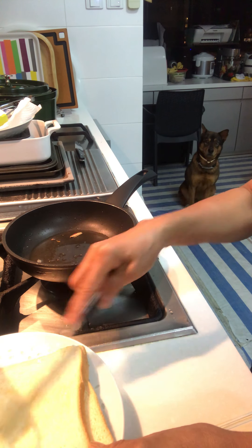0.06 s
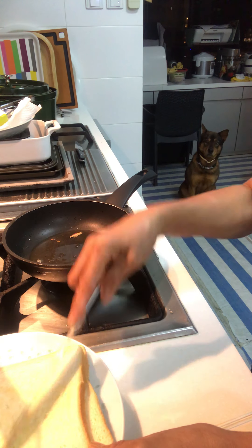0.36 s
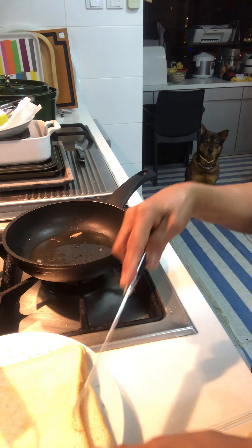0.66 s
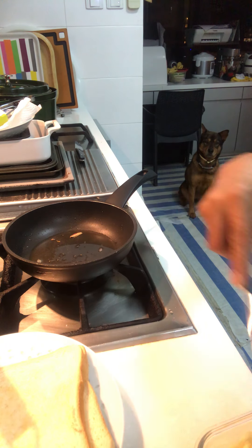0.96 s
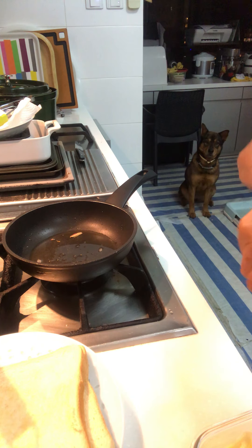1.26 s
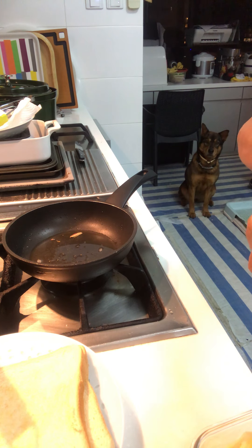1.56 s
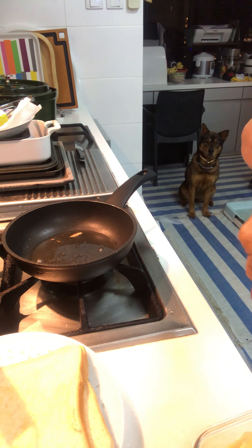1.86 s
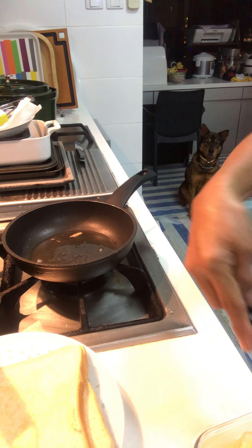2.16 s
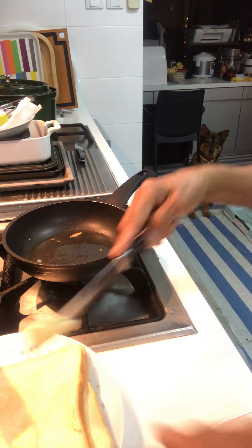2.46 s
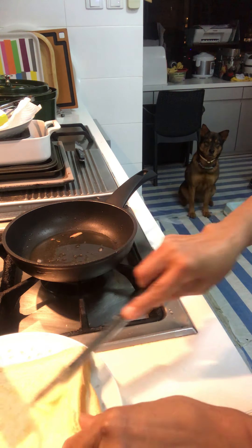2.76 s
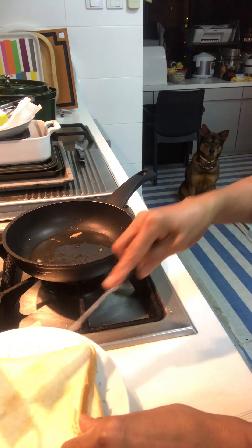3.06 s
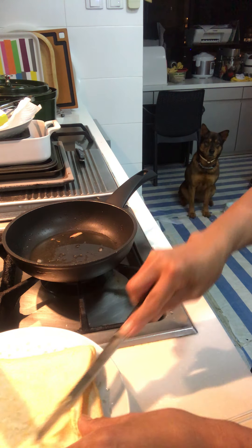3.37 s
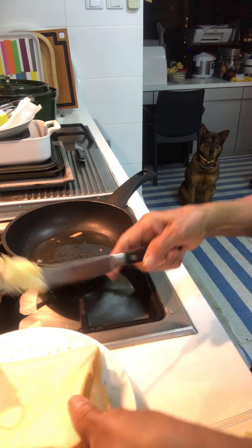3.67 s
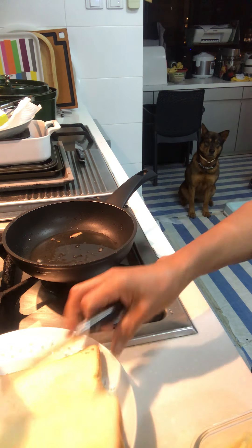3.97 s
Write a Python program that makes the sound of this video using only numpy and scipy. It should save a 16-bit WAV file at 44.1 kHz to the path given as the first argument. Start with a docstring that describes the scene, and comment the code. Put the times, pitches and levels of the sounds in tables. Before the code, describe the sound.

Close, dry scraping of a knife buttering toast comes in two pairs of strokes, with faint blade ticks and one sharp knock on a dish between them. Behind it, a fan drones steadily in a small tiled kitchen.

```python
"""A small tiled kitchen, the microphone close to a slice of toast. A fan drones from start to finish.
A table knife spreads butter in two rasping strokes, breaking crumbs and cracking the crust; a soft bump
follows. Fetching more butter, the blade ticks twice and knocks once on a dish, and the room answers.
Two more strokes cross the toast, the slice rustles as the blade lifts, and a dull bump comes last."""
import sys
import numpy as np
from scipy import signal
from scipy.fft import rfft, irfft, next_fast_len
from scipy.io import wavfile
from scipy.ndimage import uniform_filter1d, map_coordinates

SR = 44100
rng = np.random.default_rng(int(sys.argv[2]) if len(sys.argv) > 2 else 0)


def file_out(sig):
    """Save sig as 16-bit WAV at sys.argv[1]."""
    # one column per channel
    cols = np.atleast_2d(sig).T
    # limit, then scale
    lim = np.clip(cols, -1, 1)
    pcm = np.round(lim * 32767).astype(np.int16)
    wavfile.write(sys.argv[1], SR, pcm)


N = 4 * SR


def amp(db):
    """Decibels to gain."""
    return 10 ** (np.asarray(db) / 20)


def unit(x):
    """Scale to rms 1."""
    return x / np.sqrt(np.mean(x ** 2) + 1e-20)


def along(points, hz):
    """Read (Hz, value) points on a log frequency axis."""
    f, v = np.transpose(points)
    return np.interp(np.log(hz + 1), np.log(f + 1), v)


def clock():
    """Time of every sample in seconds."""
    return np.arange(N) / SR


def wobble(per_s):
    """A smooth random curve with per_s knots a second."""
    return map_coordinates(rng.standard_normal(4096), [clock() * per_s], mode="wrap")


def filtered(x, response):
    """x through a response given as a function of Hz."""
    size = next_fast_len(N + SR // 2)
    return irfft(rfft(x, size) * response(np.fft.rfftfreq(size, 1 / SR)), size)[:N]


def coloured(x, spectrum):
    """x shaped by (Hz, dB) points, at rms 1."""
    return unit(filtered(x, lambda hz: amp(along(spectrum, hz))))


def resonant(peaks):
    """Noise in resonances given as (centre Hz, width Hz, dB)."""
    out = np.zeros(N)
    for hz, width, db in peaks:
        band = filtered(rng.standard_normal(N), lambda f: 1 / (1 + ((f - hz) / width * 2) ** 2))
        out += amp(db) * unit(band)
    return out


def fade(t, t60):
    """Exponential decay, 60 dB down after t60 seconds."""
    return np.exp(-np.log(1000) * t / t60)


def add(track, s, sound):
    """Mix a sound in at s seconds."""
    part = track[round(s * SR):][:len(sound)]
    part += sound[:len(part)]


# The swell of the fan's main tone. Each row: time in seconds, relative level in dB.
DRONE_SWELL = [(0, -40), (0.11, -47), (0.21, -31.5), (0.35, -39), (0.42, -30), (0.51, -28), (0.58, -45.5),
               (0.68, -38.5), (0.75, -31.5), (1.08, -36.5), (1.22, -31), (1.6, -39.5), (1.8, -47),
               (2.05, -32), (2.24, -43.5), (2.38, -35), (2.57, -64.5), (2.68, -35.5), (2.95, -31.5),
               (3.24, -35), (3.44, -37.5), (3.55, -34.5), (3.8, -30.9), (4.0, -42)]
# The fan's other tones. Each row: pitch in Hz, level in dB.
ROTOR_TONES = [(47.5, -56.5), (72, -51), (120, -44.5), (144, -48.5), (169, -47), (196, -47.5), (247, -48),
               (271, -49), (294, -48.5), (343, -56)]


def fan_rotor():
    """The rotor hums behind the toast: one swelling drone among fainter, wavering tones."""
    t = clock()
    drone_hz = 93.82 + 1.004 * wobble(per_s=7.035)
    drone_db = np.interp(t, *np.transpose(DRONE_SWELL)) - 1 + 2.02 * wobble(per_s=11)
    out = amp(drone_db) * unit(np.sin(2 * np.pi * np.cumsum(drone_hz) / SR))
    for hz, db in ROTOR_TONES:
        waver = 1 + 0.691 * (wobble(per_s=8) + 1j * wobble(per_s=8))  # in level and phase
        tone = np.exp(2j * np.pi * (hz * t + rng.random()))
        out += amp(db) * unit(np.real(waver * tone))
    return out


# The fan's rumble and its rush of air. Each row: frequency in Hz, relative level in dB.
RUMBLE_COLOUR = [(15, -61), (25, -39.5), (59, -12.5), (76, -6), (97, -4), (139, -10), (173, -0.5),
                 (220, -9.5), (284, -9.5), (450, -28.5), (580, -73.5), (990, -120)]
AIR_COLOUR = [(240, -11), (400, 1), (470, -4), (560, 1.5), (740, -1), (820, -5.5), (1020, -5.5), (1300, -3),
              (1550, -8.5), (1950, -12), (2250, -11.5), (2650, -10.5), (3200, -10), (3600, -14),
              (4100, -15.5), (4400, -17), (4850, -27.5), (5300, -17), (6600, -17.5), (7450, -25),
              (7900, -20.5), (8600, -22.5), (10400, -33.5), (11900, -26), (13000, -33.5), (14000, -30),
              (16000, -38.5)]
# Resonances of the duct and of a narrow hiss. Each row: centre in Hz, width in Hz, base level in dB.
DUCT_PEAKS = [(1135, 68, -59.5), (1395.8, 97, -58), (1718, 72, -66.5), (2454, 92, -66.5), (3309, 72, -63.5),
              (5658, 284, -63.5), (6994, 185, -72)]
HISS_PEAKS = [(2919, 118, -57), (3051, 167, -56.5)]
# The rise and fall of that hiss. Each row: time in seconds, gain in dB.
HISS_SWELL = [(0, -6), (.36, 3), (.72, 0), (1.1, 0.5), (1.5, 3), (1.9, 1), (2.35, 1.5), (2.52, -2),
              (2.8, -3.5), (3.1, -2.5), (3.35, 3), (3.5, -3.5), (3.7, 2), (4, 0)]


def fan_air():
    """Air rushes through the fan's duct, with a low rumble of eddies and a fluttering hiss."""
    hiss_db = np.interp(clock(), *np.transpose(HISS_SWELL)) + 2.5 * wobble(per_s=25.036)
    eddies = amp(1.5 * wobble(per_s=9)) * rng.standard_normal(N)
    rumble = amp(-40) * coloured(eddies, RUMBLE_COLOUR)
    rush = amp(-48.5) * coloured(rng.standard_normal(N), AIR_COLOUR)
    return resonant(DUCT_PEAKS) + amp(hiss_db) * resonant(HISS_PEAKS) + rumble + rush


def crumbs(per_s=3800, spread_db=3, smear_db=-6):
    """The envelope of countless tiny, uneven fractures over the smooth smear of butter."""
    chance, size = rng.random(N), rng.exponential(size=N)
    breaks = (chance < per_s / SR) * amp(spread_db * np.minimum(size, 5))
    decay = fade(clock()[:SR // 20], t60=0.00174)
    energy = np.abs(signal.fftconvolve(breaks ** 2, decay ** 2)[:N])
    stick_slip = amp(1.8552 * wobble(per_s=216.95))  # the blade catches and slips
    return unit((unit(np.sqrt(energy)) + amp(smear_db)) * stick_slip)


# Four knife strokes close to the microphone, one list each. Each row: time in seconds, rasp level
# in dB, crunch and sizzle offsets from it in dB, all before the trims.
KNIFE_STROKES = [
    [(0.0, -40, 4, -9.5), (0.038, -34.5, 2, -8), (0.074, -20, -5.5, -6.5), (0.118, -30.5, 1, 1),
     (0.162, -37, -5.5, -6), (0.242, -34.5, -7, -3), (0.254, -31.5, -1, -10), (0.264, -60, 2.5, -12),
     (0.29, -56, -5, -4)],
    [(0.38, -46.5, 6, -12), (0.39, -52.5, 1.5, -3), (0.456, -41, 3.5, -0.5), (0.496, -44, -1, -3),
     (0.54, -22, -5.5, -4), (0.59, -34.5, 2, -5.5), (0.608, -55.5, 6.5, 2), (0.64, -62.5, 1.5, -9)],
    [(2.69, -44, -6, -15), (2.7, -56, 3, -4.5), (2.712, -44.5, -1.5, -5.5), (2.724, -47, 8, -9.5),
     (2.732, -37.5, 0, -18.5), (2.744, -38, 2, -8), (2.808, -36.5, 1, -3), (2.872, -42, -3.5, -11),
     (2.894, -44, 2.5, 2), (2.928, -44, 2.5, -6), (2.938, -45.5, -3, -0.5), (2.99, -43, -0.5, -6.5),
     (3.026, -77, 12, -12), (3.03, -59.5, -5, -11)],
    [(3.21, -93.5, -5, -16), (3.224, -38, 1, -10), (3.264, -35.5, -8, -4), (3.278, -38, -4.5, -2.5),
     (3.292, -31, -1.5, -3), (3.314, -37.5, -1.5, -3), (3.414, -46.5, 4.5, -5), (3.428, -42, -3, -14),
     (3.468, -56.5, 11, -1.5), (3.49, -63, 9.5, -2.5)],
]
# The middle, low and high parts of a stroke. Each row: frequency in Hz, relative level in dB.
RASP_COLOUR = [(1500, -58), (2300, -1), (2650, -1.5), (3050, -2.5), (3400, 0.5), (3800, -0.5), (4050, 1),
               (4400, -0.5), (4850, -1.5), (5300, -0.5), (5800, 0), (6500, 0.5), (7400, -3), (8100, -4.5),
               (10500, -34)]
CRUNCH_COLOUR = [(100, -70), (210, -36), (350, -8), (520, -6.5), (640, 0.5), (770, -5), (900, 6.5),
                 (1180, -1.5), (1550, 2), (1900, 4), (2300, -1.5), (2700, 0.5), (3600, -44.5)]
SIZZLE_COLOUR = [(5500, -26), (8000, -3.5), (8800, 3), (10200, -0.5), (11800, 1), (13000, -2),
                 (15600, -0.5), (16500, -17.5)]
# The slice's resonance, stroke by stroke. Each row: centre in Hz, width in Hz, dB against the crunch.
SLICE_HOLLOWS = [(1708, 500, -3), (886, 93, -8.5), (904, 420, -5.5), (1046, 350, -5)]
# Short echoes off plate and worktop. Each row: delay in seconds, gain.
WORKTOP_ECHOES = [(.00135, 0.243), (.0034, -0.257), (.0061, 0.069)]


def spreading(rasp_trim_db=-1, crunch_trim_db=-1.5, sizzle_trim_db=-1.5):
    """Each stroke breaks crumbs: a rasp, a fine sizzle, and the low crunch and resonance of the slice."""
    t, grain = clock(), crumbs()
    levels, direct = np.zeros((3, N)), np.zeros(N)
    for stroke, hollow in zip(KNIFE_STROKES, SLICE_HOLLOWS):
        times, db, low_db, high_db = np.transpose(stroke)
        contact = uniform_filter1d(1.0 * ((t >= times[0]) & (t <= times[-1])), size=256)
        rasp = contact * amp(np.interp(t, times, db + rasp_trim_db))
        crunch = contact * amp(np.interp(t, times, db + low_db + crunch_trim_db))
        sizzle = contact * amp(np.interp(t, times, db + high_db + sizzle_trim_db))
        levels += [rasp, crunch, sizzle]
        direct += crunch * resonant([hollow])
    for level, colour in zip(levels, (RASP_COLOUR, CRUNCH_COLOUR, SIZZLE_COLOUR)):
        direct += level * coloured(grain * rng.standard_normal(N), colour)
    return filtered(direct, lambda hz: 1 + sum(gain * np.exp(-2j * np.pi * hz * delay)
                                               for delay, gain in WORKTOP_ECHOES))


# The tiled room's decay. Each row: frequency in Hz, t60 in seconds.
ROOM_DECAY = [(200, 0.01), (1100, 0.4751), (1850, 0.4215), (3200, 0.4042), (6000, 0.2821), (14000, 0.3662)]
# The tone of its answer. Each row: frequency in Hz, relative level in dB.
ROOM_TONE = [(100, 7), (800, 6.5), (1150, 4), (1900, 4.5), (2500, -2), (3200, 3.5), (7000, 3.5),
             (15000, -3)]


def kitchen(x):
    """The room's answer reaches the microphone 4 ms late, each frequency dying at its own speed."""
    hz, t, spectra = signal.stft(rng.standard_normal(SR // 2), SR, nperseg=256)
    decay = fade(t, along(ROOM_DECAY, hz)[:, None])
    colour = amp(along(ROOM_TONE, hz))[:, None]
    tail = signal.istft(spectra * decay * colour, SR, nperseg=256)[1]
    delayed = np.pad(x, (SR // 250, 0))
    return signal.fftconvolve(delayed, tail / np.linalg.norm(tail))[:N]


# The blade touches or cracks the crust. Each row: start in seconds, level in dB.
CRUST_SNAPS = [(.069, -23), (.076, -24.5), (.083, -16.5), (.12, -24.5), (0.1982, -27), (0.207, -46),
               (0.3804, -38), (0.455, -34.5), (.524, -24), (2.6461, -28.5), (2.649, -29.5), (2.715, -31),
               (2.7319, -22.5), (2.741, -25), (2.774, -25.5), (2.815, -26.5), (2.899, -28.5), (2.953, -31),
               (3.2238, -30.5), (3.244, -37), (3.426, -30.5), (3.736, -41.5), (3.7527, -35)]
# The slice rustles as the blade lifts. Each row: time in seconds, level in dB.
LIFT_RUSTLE = [(3.52, -75.5), (3.565, -54), (3.62, -62.5), (3.69, -56), (3.73, -48.5), (3.755, -58),
               (3.79, -72), (3.87, -74.5)]
# The tone of both. Each row: frequency in Hz, relative level in dB.
CRUST_COLOUR = [(200, -12), (700, 3.5), (1600, 3), (4000, 6), (6000, -1.5), (10000, -10), (16000, -8.5)]


def crust():
    """The crust gives single dry cracks under the blade and a faint, crumbly rustle at the end."""
    rustle_db = np.interp(clock(), *np.transpose(LIFT_RUSTLE), left=-np.inf, right=-np.inf)
    level = amp(rustle_db) * crumbs()
    for s, db in CRUST_SNAPS:
        add(level, s, amp(db) * fade(clock()[:SR // 10], t60=0.0155))
    return level * coloured(rng.standard_normal(N), CRUST_COLOUR)


# Soft bumps of slice and plate. Each row: start in seconds, level in dB, centre in Hz, width in Hz,
# t60 in seconds.
SOFT_BUMPS = [(.670, -34, 910, 701, 0.057), (3.955, -35, 354.4, 90, 0.185)]


def bumps():
    """Dull contacts without a ring: a short puff in one broad resonance."""
    out, t = np.zeros(N), clock()[:SR // 4]
    attack = 1 - np.exp(-t / 0.0025)
    for s, db, hz, width, t60 in SOFT_BUMPS:
        add(out, s, resonant([(hz, width, db)])[:len(t)] * fade(t, t60) * attack)
    return out


def struck(blows, modes, crack_colour, crack_db, crack_t60):
    """Every blow gives a short crack and rings the damped modes, in a slightly different balance."""
    out, t = np.zeros(N), clock()[:SR // 4]
    attack = 1 - np.exp(-t / 0.0003)
    for s, db in blows:
        ring = sum(amp(level + rng.normal(0, 1)) * fade(t, t60) * np.sin(2 * np.pi * hz * t)
                   for hz, level, t60 in modes)
        noise = coloured(rng.standard_normal(N), crack_colour)[:len(t)]
        crack = amp(crack_db) * fade(t, crack_t60) * noise
        add(out, s, amp(db) * (ring + crack) * attack)
    return out


# Light ticks between the pairs of strokes. Each row: start in seconds, level in dB.
BLADE_TICKS = [(1.0355, -39), (1.8277, -27)]
# The blade's modes. Each row: pitch in Hz, relative level in dB, t60 in seconds.
BLADE_MODES = [(3589, 2, 0.0292), (4236, -10.5, 0.029), (4638, -5, 0.0284), (7040, -6.5, .025),
               (7780, -8.5, .022), (13400, -21, .01)]
# The crack of a tick. Each row: frequency in Hz, relative level in dB.
TICK_COLOUR = [(300, -6.5), (1500, 4), (4500, 3), (8000, -17.5), (10000, -20.5), (16000, -23.5)]


def blade_ticks():
    """Light touches set the blade ringing, high and brief."""
    return struck(BLADE_TICKS, BLADE_MODES, TICK_COLOUR, crack_db=-4, crack_t60=0.0316)


# One knock, made of two contacts in quick succession. Each row: start in seconds, level in dB.
DISH_CONTACTS = [(2.0559, -6.5), (2.0594, -20)]
# The dish's modes. Each row: pitch in Hz, relative level in dB, t60 in seconds.
DISH_MODES = [(419, -15, 0.046), (1080, -29.5, .022), (1149, -4.5, 0.0184), (1746, -14, 0.031),
              (1890, 2, 0.019), (2142, 0.5, .019), (2354, -3, 0.0159), (2702, -16, 0.0298),
              (3159, -7, 0.0256), (3330, -27.5, 0.0204), (4590, -20.5, 0.0246), (5710, -22.5, 0.0344),
              (7074, -27, 0.066), (8880, -19, 0.011)]
# The crack of the knock. Each row: frequency in Hz, relative level in dB.
KNOCK_COLOUR = [(200, -16.5), (700, -9.5), (1200, 10.5), (2500, -0.5), (4200, -14), (6000, -5.5),
                (9500, -9.5), (16000, -15.5)]


def dish_knock():
    """The knife strikes the dish, whose short ring is the loudest thing at the microphone."""
    return struck(DISH_CONTACTS, DISH_MODES, KNOCK_COLOUR, crack_db=-8.5, crack_t60=0.0186)


def scene():
    """One microphone: toast, knife and dish up close, the room and the fan behind them."""
    bread = spreading() + crust() + bumps()
    hits = blade_ticks() + dish_knock()
    room = kitchen(amp(-15.5) * bread + amp(-12) * hits)
    return (fan_rotor() + fan_air() + bread + hits + room)[None]


def record(dry):
    """The recorder clips at full scale, drops the deepest bass and keeps nothing above its band limit."""
    low_cut_hz, top_hz = 33.3, 15950
    clipped = np.clip(dry[0], -1, 1)
    return filtered(clipped, lambda hz: (hz < top_hz) * (1 - np.exp(-(hz / low_cut_hz) ** 4)))[None]


dry = scene()
out = record(dry)
file_out(out)
```